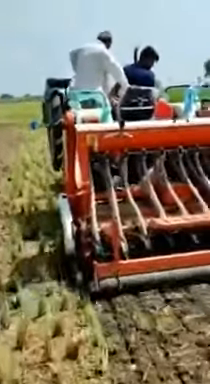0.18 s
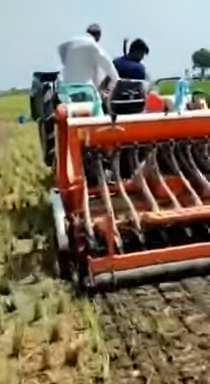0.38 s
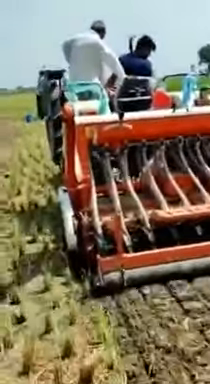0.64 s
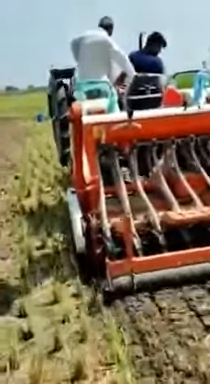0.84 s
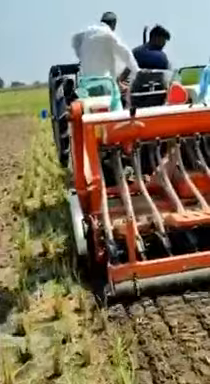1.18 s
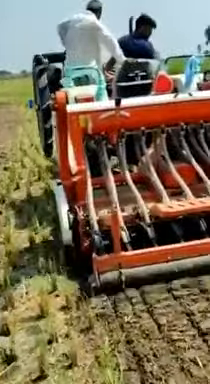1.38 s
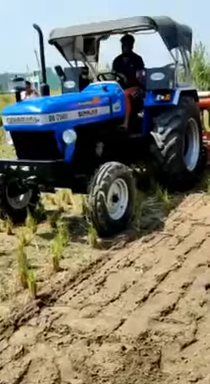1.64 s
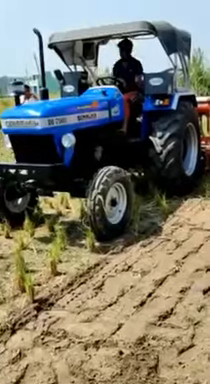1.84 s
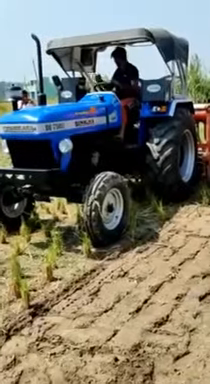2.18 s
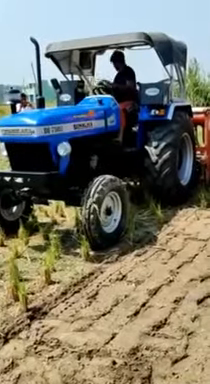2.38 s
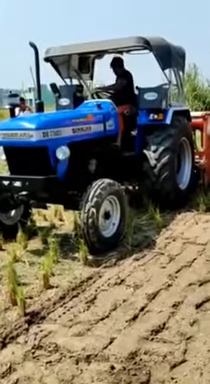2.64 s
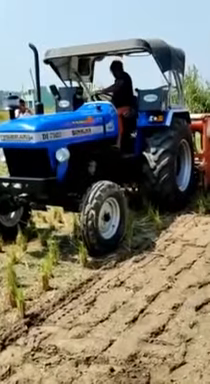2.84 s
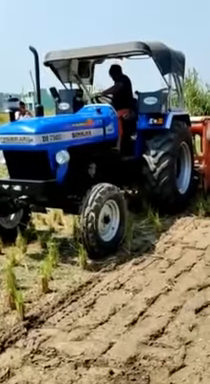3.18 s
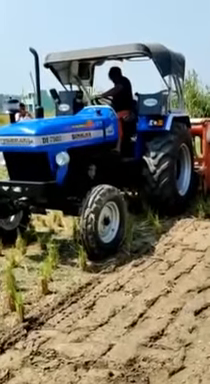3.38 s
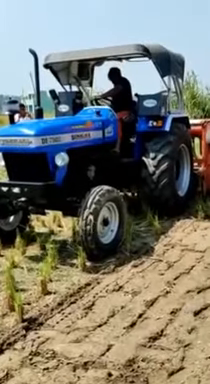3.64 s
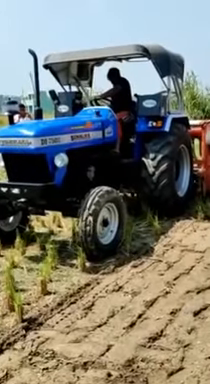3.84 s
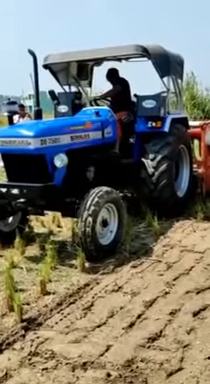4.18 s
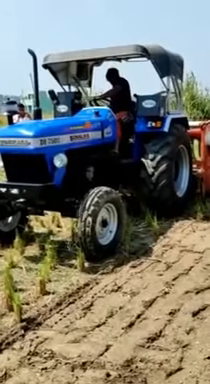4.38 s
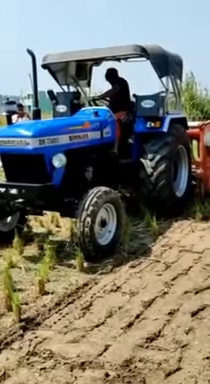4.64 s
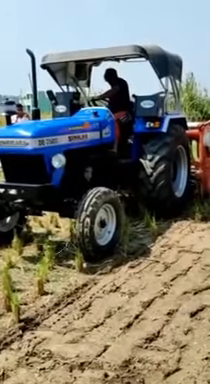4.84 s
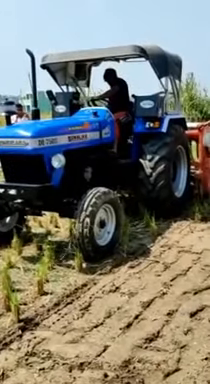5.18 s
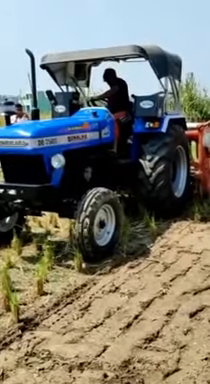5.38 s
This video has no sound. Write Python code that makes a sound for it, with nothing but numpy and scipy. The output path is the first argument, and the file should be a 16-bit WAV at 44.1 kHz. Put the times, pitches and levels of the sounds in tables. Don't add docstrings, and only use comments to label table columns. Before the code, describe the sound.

Outdoors in a field, a four-cylinder diesel tractor is heard close from behind, chugging at low revs while loose seed-drill steel snaps. After about a quarter second of silence, it returns from the front, faster and smoother, with gusts thumping the handheld phone's microphone.

```python
import sys
import numpy as np
from scipy import signal
from scipy.fft import rfft, irfft, next_fast_len
from scipy.io import wavfile
from scipy.ndimage import uniform_filter1d, map_coordinates

SR = 44100
rng = np.random.default_rng(int(sys.argv[2]) if len(sys.argv) > 2 else 0)


def int16_out(signal):
    q = np.round(np.clip(np.atleast_2d(signal).T, -1, 1) * 32767)
    wavfile.write(sys.argv[1], SR, q.astype(np.int16))


def invert_db(x):
    u = np.asarray(x, float) / 20
    return 10 ** u


N = 242991
TIME = np.arange(N) / SR

REAR, FRONT = (0, 1.269), (1.526, 5.6)
REAR_DB, FRONT_DB = -26, -21.5
REAR_BREEZE_DB, FRONT_BREEZE_DB = (-21, -16.5), (-24, -11)

# (time [s], four-stroke cycle rate [1/s])
REAR_SPEED = [(0.0, 10.06), (1.27, 10.195)]
FRONT_SPEED = [(1.53, 15.12), (3.0, 15.115), (3.7, 15.065), (5.51, 15.068)]
# (multiple of the cycle rate [1], level over the roar [dB])
REAR_ORDERS = [(4, 6), (8, 8.1), (12, -12.5), (14, -4.5), (20, -7.5), (24, -9)]
FRONT_ORDERS = [(4, 6), (8, -5.5), (10, -14.5), (12, -11.5), (15, -12.5), (16, -16), (17, -20.5), (18, -25),
                (19, -9), (21, -25.5), (28, -17.5), (37, -14.5), (40, -20.5), (45, -19.5), (48, -18),
                (52, -17), (71, -13), (76, -17.5), (80, -15), (87, -16.5)]
# (time [s], level over the roar [dB])
REAR_EIGHTH = [(0, 9.1), (1.27, 9.7)]
FRONT_EIGHTH = [(1.53, -1), (3.3, -3.5), (3.6, -13.5), (5.5, -8)]
# (frequency [Hz], level over the roar [dB])
REAR_GEARS = [(279, -11), (352.5, -19), (494, -22), (513, -12.5), (582, -13), (617.5, -8.5), (865.5, -13),
              (988, -13.5), (1111.5, -10.5)]
FRONT_GEARS = [(201, -13), (351.5, -10), (422, -26.5)]
# (frequency [Hz], level [dB per Hz])
REAR_BODY = [(150, -9.5), (300, -13), (420, -13), (620, -8.5), (800, -11), (950, -13), (1150, -10.5),
             (1500, -15), (2000, -18.5), (2800, -20), (4200, -28), (7000, -26), (10000, -38.5),
             (15500, -42.5)]
FRONT_BODY = [(150, -6.5), (300, -9.5), (420, -7.5), (620, -4), (800, -7), (950, -10), (1150, -7.5),
              (1500, -10), (2000, -11.5), (2800, -14.5), (4200, -18.5), (7000, -24.5), (10000, -32),
              (15500, -40)]
# (frequency [Hz], width [Hz], level [dB])
REAR_ECHOES = [(772, 20, -7.5), (1380, 100, -3), (2130, 150, -2.5), (2330, 150, 3.5), (2450, 120, -3),
               (5970, 620, -4)]
FRONT_ECHOES = [(903, 66, -2), (1340, 100, -2), (1852, 122, -4), (2540, 130, -3.5), (2890, 120, 2.5),
                (3070, 100, -7.5), (3340, 680, 0), (4330, 72, -2.5), (7810, 360, 0)]
# (time [s], peak level [dB])
TICKS = [
    (0.0887, -26),
    (0.485, -19),
    (0.535, -22),
    (1.004, -19),
    (1.1004, -20.5),
    (1.175, -14),
    (1.248, -15),
]

# (frequency [Hz], level [dB])
REAR_MUFFLE = [(80, -4.5), (250, -5.5), (400, -11), (600, -18.5), (860, -9), (1050, -21), (1300, -17.5),
               (2500, -25), (4500, -34.5), (6500, -65.5), (16000, -58)]
FRONT_MUFFLE = [(80, -58), (350, -70), (600, -58), (850, -53), (1200, -64), (2500, -62), (4500, -64),
                (6500, -74), (16000, -78)]
# (frequency [Hz], level [dB per Hz])
LEFT_PUMP = [(2, -18.5), (6, -20), (14, 5), (28, 1), (50, -13.5), (90, -40), (200, -90.5)]
REAR_PUMP = [(2, -4.5), (6, 0.5), (10, 13), (25, -2.5), (40, -2), (70, -1), (130, -11), (170, -22),
             (400, -50.5), (900, -117)]
FRONT_PUMP = [(2, -6), (6, 5.5), (10, 1.5), (15, -3.5), (25, -11), (45, -23.5), (70, -43), (170, -76),
              (900, -120)]
# (frequency [Hz], level [dB per Hz])
FLUTTER = [(30, -19.5), (55, 5.5), (100, 2), (170, -6.5), (300, -17), (800, -29), (2000, -41), (5000, -120)]
# (frequency [Hz], level [dB per Hz])
PUFF = [(80, -1), (200, 9), (500, -2.5), (800, -22.5), (1500, -33), (4000, -24), (7000, -120)]
CREAK = [(90, -10), (200, 0), (400, -7), (900, -17), (2000, -25), (5000, -60), (7000, -120)]
HANDLING = [(30, -12), (55, 6), (100, -9.5), (140, -12), (180, -34), (400, -66), (900, -120)]
# (time [s], peak level [dB], half length [s])
LEFT_GUSTS = [(.42, -21, 0.072), (.9, -16.5, 0.083), (1.08, -16.5, .1), (2.3, -18.5, .12), (2.98, -17, .04),
              (3.33, -12, 0.064), (3.49, -13.5, 0.055), (3.6, -13, 0.057), (3.73, -13, 0.057),
              (4.0, -23, 0.077), (4.33, -17.5, 0.096), (4.65, -18.5, 0.11), (5.0, -24, .08),
              (5.3, -19.5, 0.13), (5.5, -30.5, 0.045)]
RIGHT_GUSTS = [(.1, -9, .07), (.37, -10.5, 0.076), (.8, -13, 0.23), (1.0, -25, 0.041), (1.68, -3.5, .1),
               (1.9, -4.5, 0.16), (2.18, -2.5, 0.025), (2.4, -4.5, 0.036), (2.55, 2, 0.091),
               (2.68, 2, 0.095), (2.85, -6.5, .06), (3.13, -3.5, 0.053), (3.45, -4.5, 0.048),
               (3.67, 0.5, 0.094), (4.03, -3.5, 0.075), (4.45, -1.5, 0.11), (4.65, -11, 0.057),
               (4.87, -5.5, .08), (5.1, -4, 0.043), (5.42, -4.5, 0.094)]
# (time [s], peak level [dB], half length [s])
FLUTTER_FITS = [
    (.45, -24, 0.048),
    (.6, -24, .05),
    (2.33, -26, 0.053),
    (3.32, -24, .05),
    (3.5, -17, 0.058),
    (4.65, -30, 0.036),
]
# (time [s], level [dB])
LEFT_PUFFS = [
    (2.29, -16.5),
    (2.36, -26),
    (3.3, -11),
    (3.5, -10.5),
    (3.63, -13),
    (3.69, -26),
    (3.745, -37),
    (4.63, -23.5),
    (5.27, -13),
]
# (time [s], level [dB])
RIGHT_CREAKS = [(1.69, -45), (2.352, -47), (2.45, -42), (2.502, -34), (2.553, -31), (2.639, -40),
                (2.75, -46), (3.0, -53), (3.4, -55), (3.63, -50.5), (3.68, -57), (3.79, -59.5), (4.0, -54),
                (4.25, -47), (4.45, -45), (4.51, -34), (5.1, -53), (5.42, -57)]
# (time [s], peak level [dB], frequency [Hz])
SHOVES = [
    (3.598, -3, 7.9),
    (3.7, -2, 20),
]
# (time [s], step level [dB])
SLIPS = [
    (1.546, -27),
    (1.589, -15),
    (1.629, -16),
    (2.503, -26),
    (2.52, -24),
    (2.55, -22.5),
    (4.5, -27),
]
# (time [s], level [dB])
DUCKS = [
    (1.5, -7),
    (2.48, -7),
    (2.628, -4),
    (4.04, -2),
    (4.5, 0),
    (5.42, -0.5),
]


def unit(x):
    return x / np.sqrt(np.mean(x ** 2) + 1e-20)


def along(points, hz):
    f, v = np.transpose(points)
    return invert_db(np.interp(np.log(hz + .5), np.log(f + .5), v, left=-120))


def curves(rows):
    s, *cols = np.transpose(rows)
    return [np.interp(TIME, s, c) for c in cols]


def wobble(rate, at=TIME):
    coarse = TIME[::64]
    knots = rng.standard_normal(int(N * rate / SR) + 4)
    return np.interp(at, coarse, map_coordinates(knots, [coarse * rate]))


def filtered(x, response):
    m = next_fast_len(N + 8192)
    return irfft(rfft(x, m) * response(np.fft.rfftfreq(m, 1 / SR)), m)[..., :N]


def band_rms(x, band):
    return np.std(filtered(x, lambda hz: (hz > band[0]) & (hz < band[1])))


def random_field(shape, bins, frames):
    field = uniform_filter1d(rng.standard_normal(shape), size=bins, axis=0)
    return uniform_filter1d(field, size=frames, axis=1)


def patchy(depth_db):
    z = signal.stft(rng.standard_normal(N), nperseg=512)[2]
    field = random_field(z.shape, 8, 8)
    return signal.istft(z * invert_db(depth_db * unit(field)), nperseg=512)[1][:N]


def gate(span, rise_s):
    swell = np.clip(0.36 + (TIME - span[0]) / rise_s, 0, 1)
    return swell * (TIME >= span[0]) * (TIME < span[1])


def gain_control():
    attack_s, release_s = .025, 1.18
    since = np.clip(TIME - np.array(DUCKS)[:, :1], 0, None)
    shape = (1 - np.exp(-since / attack_s)) * np.exp(-since / release_s)
    return invert_db(np.array(DUCKS)[:, 1] @ shape)


def dropouts(x, lo_hz, hi_hz, share):
    hz, _, z = signal.stft(x, SR, nperseg=1024)
    field = random_field(z.shape[1:], 5, 7)
    prone = np.interp(hz, [lo_hz - 4000, lo_hz, hi_hz, hi_hz + 300, 14000, 15800], [0, 1, 1, 0, .1, 1])
    empty = field < np.quantile(field, .5) - np.std(field) * (3.3 - share * prone[:, None])
    return signal.istft(z * np.where(empty, .1, 1), SR, nperseg=1024)[1][:, :N]


def wind_db(gusts, breeze_db):
    coarse = TIME[::64]
    power = invert_db(2 * breeze_db)
    power = power + sum(invert_db(2 * db) * np.exp(-((coarse - s) / half_s) ** 2) for s, db, half_s in gusts)
    return np.interp(TIME, coarse, 10 * np.log10(power))


def gust(spectrum, band, steady_s):
    x = filtered(rng.standard_normal(N), lambda hz: along(spectrum, hz))
    swell = np.abs(uniform_filter1d(x ** 2, int(steady_s * SR)))
    x = x / np.sqrt(swell + 0.074 * np.mean(x ** 2))
    return x / band_rms(x, band)


def flutter(left_db, band, level_db):
    steady = invert_db(.7 * left_db + level_db)
    fits = invert_db(wind_db(FLUTTER_FITS, -90))
    return (steady + fits) * invert_db(3.06 * wobble(30)) * gust(FLUTTER, band, steady_s=0.075)


def puffs(events, width_s, spectrum):
    coarse = TIME[::32]
    swell = sum(invert_db(db) * np.exp(-((coarse - s) / width_s) ** 2) for s, db in events)
    return np.interp(TIME, coarse, swell) * gust(spectrum, (60, 7000), steady_s=.02)


def shoves():
    total = np.zeros(N)
    for s, db, hz in SHOVES:
        swell = np.exp(-((TIME - s - .012) * hz / .55) ** 2)
        total += invert_db(db) * swell * np.cos(2 * np.pi * hz * (TIME - s))
    return total


def slips():
    leak_s, soft_hz = .004, 4500
    since = TIME - np.array(SLIPS)[:, :1]
    steps = -invert_db(np.array(SLIPS)[:, 1]) @ (np.exp(-np.abs(since) / leak_s) * (since > 0))
    return filtered(steps, lambda hz: 1 / (1 + 1j * hz / soft_hz) ** 2)


def grip():
    return invert_db(-39.5 + 1.6 * wobble(8.7)) * gust(HANDLING, (50, 200), steady_s=0.04)


def ports(motor, breeze_db, muffle, lag_s, pump, flutter_band, flutter_db, uncover_db=0):
    left_db, right_db = wind_db(LEFT_GUSTS, breeze_db[0]), wind_db(RIGHT_GUSTS, breeze_db[1])
    flaps = flutter(left_db, flutter_band, flutter_db)
    left = motor + invert_db(left_db) * gust(LEFT_PUMP, (5, 45), steady_s=.1) + flaps
    drift = (lag_s + .00022 * wobble(6)) * SR
    late = np.interp(np.arange(N) - drift, np.arange(N), motor)
    dull = filtered(late, lambda hz: along([(20, muffle[0][1])] + muffle, hz))
    right = invert_db(uncover_db) * dull + invert_db(right_db) * gust(pump, (4, 60), steady_s=0.093)
    return np.array([left, right])


def ticks():
    since = TIME - np.array(TICKS)[:, :1]
    decay_db = 60 * np.abs(since) / 0.023
    swell = (invert_db(np.array(TICKS)[:, 1:] + 9.5 - decay_db) * (since > 0)).sum(axis=0)
    steel = lambda hz: invert_db(20.5) * hz / (hz + 1500) / (1 + (hz / 9000) ** 2)
    return filtered(swell * rng.standard_normal(N), lambda hz: along(REAR_BODY, hz) * steel(hz))


def valve_clatter(cycle):
    taps = rng.standard_normal(4096) * invert_db(3.3 * rng.exponential(size=4096))
    clatter = unit(taps[(cycle % 1 * len(taps)).astype(int)])
    clatter = filtered(clatter, lambda hz: 1 / (1 + (hz / 1800) ** 2))
    return clatter / band_rms(clatter, (100, 1000)) / 5


def combustion(cycle, knock):
    firing = np.floor(4 * cycle).astype(int)
    since = 4 * cycle - firing
    blow = invert_db(rng.normal(0, 1.36, firing[-1] + 1))[firing]
    rise = 1 - np.exp(-since / .04)
    burst = 1 + knock * blow * rise * np.exp(-since / 0.27)
    burst = invert_db(0.14 * wobble(8) + 0.78 * wobble(30)) * burst
    calm = lambda hz: np.clip((hz - 3000) / 9000, 0, .5)
    hiss = filtered(unit(patchy(1.0)), lambda hz: np.sqrt(calm(hz)))
    return hiss + filtered(unit(burst * patchy(1.0)), lambda hz: np.sqrt(1 - calm(hz)))


def engine_notes(cycle, speed, eighth, orders, gears, unsteady_db):
    eighth_db, = curves(eighth)
    heard = (TIME > speed[0][0] - .05) & (TIME < speed[-1][0] + .05)
    notes, t, turn = np.zeros(N), TIME[heard], cycle[heard]
    for order, db in orders:
        sway_db = unsteady_db * min(order / 12, 1) * wobble(9, t)
        strength_db = (eighth_db[heard] if order == 8 else db) + sway_db
        phase = rng.random() if order % 4 else .5 - order * .045
        waver = order / 350 * wobble(12, t)
        notes[heard] += invert_db(strength_db) * np.cos(2 * np.pi * (order * turn + phase + waver))
    mean_speed = np.mean(speed, axis=0)[1]
    for hz, db in gears:
        waver = hz / 1700 * wobble(12, t)
        strength_db = db + unsteady_db * (1 + hz / 1200) * wobble(16, t)
        phase = hz * turn / mean_speed + rng.random() + waver
        notes[heard] += invert_db(strength_db) * np.sin(2 * np.pi * phase)
    return notes


def engine(speed, level_db, eighth, orders, gears, body, echoes, start, knock, repeat_db, unsteady_db):
    cycle = start + np.cumsum(curves(speed)[0]) / SR
    roar = combustion(cycle, knock) + invert_db(repeat_db) * valve_clatter(cycle)
    ripple = lambda hz: invert_db(sum(db * np.exp(-((hz - c) / w) ** 2) for c, w, db in echoes))
    roar = filtered(roar, lambda hz: along(body, hz) * ripple(hz))
    roar = roar / band_rms(roar, (800, 6000))
    notes = engine_notes(cycle, speed, eighth, orders, gears, unsteady_db)
    return invert_db(level_db) * (roar + np.sqrt(2) * notes)


def scene():
    rear = engine(REAR_SPEED, REAR_DB, REAR_EIGHTH, REAR_ORDERS, REAR_GEARS, REAR_BODY, REAR_ECHOES,
                  start=.1, knock=1.5, repeat_db=-8.0, unsteady_db=2.5)
    front = engine(FRONT_SPEED, FRONT_DB, FRONT_EIGHTH, FRONT_ORDERS, FRONT_GEARS, FRONT_BODY, FRONT_ECHOES,
                   start=.047, knock=0.4, repeat_db=-5.0, unsteady_db=1.0)
    loosening_db = 4 * (TIME - 0.4)
    behind = ports(rear + ticks(), REAR_BREEZE_DB, REAR_MUFFLE, 0.0005, REAR_PUMP, (95, 135),
                   flutter_db=-15.5, uncover_db=loosening_db)
    swing = np.exp(-((TIME - REAR[1]) / 0.012) ** 2)
    behind[1] = (1 - swing) * behind[1] - invert_db(-8.5) * swing
    ahead = ports(front, FRONT_BREEZE_DB, FRONT_MUFFLE, .00002, FRONT_PUMP, (72, 112), flutter_db=-14)
    ahead[0] += shoves() + puffs(LEFT_PUFFS, width_s=0.012, spectrum=PUFF)
    ahead[1] += puffs(RIGHT_CREAKS, width_s=0.015, spectrum=CREAK) + slips() + grip()
    return behind * gate(REAR, rise_s=0.0012) + ahead * gate(FRONT, rise_s=0.055)


def top_cut(x):
    return signal.sosfilt(signal.butter(12, 16520, fs=SR, output="sos"), x)


def record(dry):
    x = dry * gain_control()
    x = x / (1 + np.abs(x / .92) ** 4) ** (1 / 4)
    x = filtered(x, lambda hz: hz < 15800)
    x = dropouts(x, 8000, 10000, share=2.2)
    missing = (TIME > FRONT[0] - .05) * np.clip((1.712 - TIME) / .025, 0, 1)
    x = x - missing * filtered(x, lambda hz: hz > 10250)
    x = x * ((TIME < REAR[1]) | (TIME >= FRONT[0]))
    after = TIME - REAR[1]
    smear = invert_db(-44 - 900 * np.abs(after)) * (after > 0) * (after < .022)
    x[0] += smear * unit(filtered(rng.standard_normal(N), lambda hz: along(PUFF, hz)))
    return top_cut(x)


dry = scene()
out = record(dry)
int16_out(out)
```